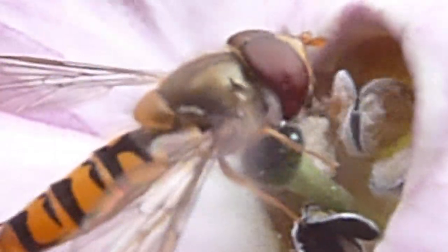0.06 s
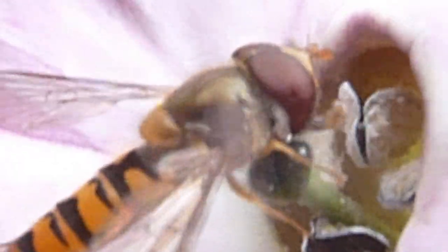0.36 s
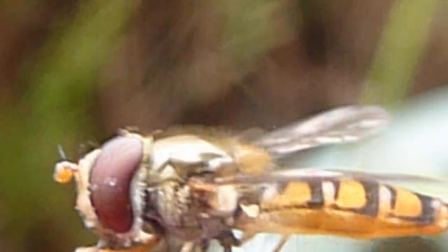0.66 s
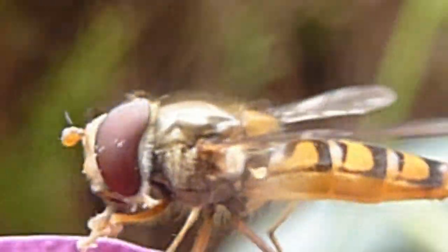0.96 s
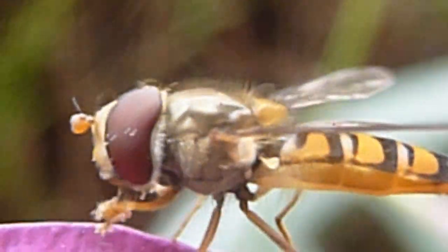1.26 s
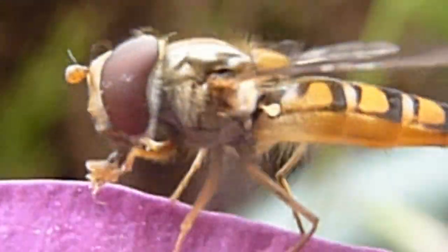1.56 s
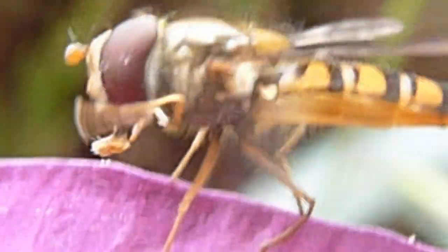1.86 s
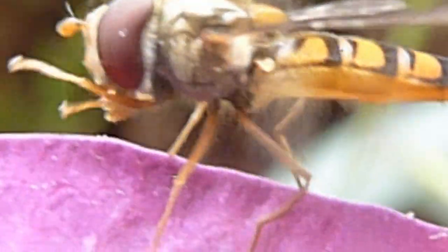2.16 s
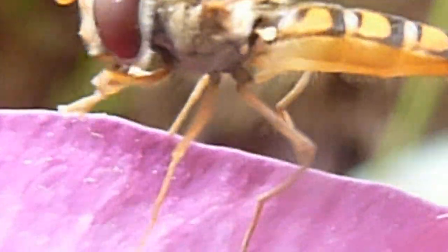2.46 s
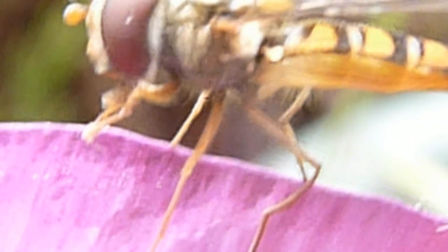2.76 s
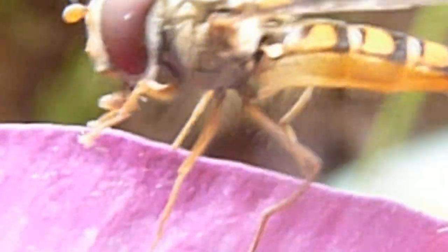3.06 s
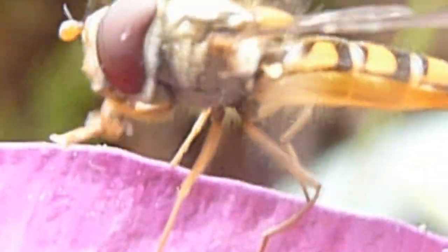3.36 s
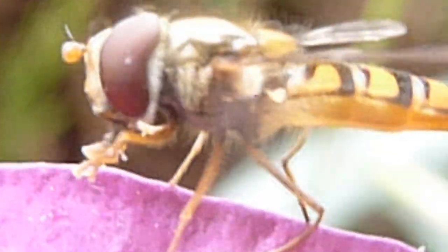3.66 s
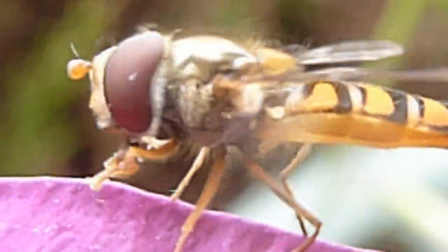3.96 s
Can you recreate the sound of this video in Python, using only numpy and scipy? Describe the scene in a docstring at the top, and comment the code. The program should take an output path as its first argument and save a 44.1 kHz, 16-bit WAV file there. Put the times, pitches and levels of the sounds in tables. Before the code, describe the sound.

A faint, steady outdoor hush of distant traffic and leaves fills a garden, with tiny far-off bird chirps. It cuts out briefly, then returns with one small plastic click, a soft low rumble and a few more chirps.

```python
"""Distant traffic and leaves make a steady hush in a quiet garden, and a low rumble swells and fades.
A small plastic part clicks and rings briefly, followed by a faint whirr. Small birds whistle far off,
their notes scattered by trees and walls. Early on, all goes silent for about half a second.
A low sample rate of 16 kHz cuts the highest treble and leaves a faint mirror image in its place."""
import sys
import numpy as np
from scipy import signal
from scipy.fft import rfft, irfft
from scipy.io import wavfile

SR = 44100
rng = np.random.default_rng(int(sys.argv[2]) if len(sys.argv) > 2 else 0)


def pcm_store(signal):
    """Save signal as 16-bit PCM."""
    levels = np.round(np.clip(np.atleast_2d(signal), -1, 1) * 32767)
    wavfile.write(sys.argv[1], SR, levels.astype(np.int16).T)


N = 176400
GAP_START_S, GAP_END_S = 0.8126, 1.2871  # the silent stretch


def hush(spectrum, level_db):
    """Distant traffic and leaves: noise in octave bands, each flickering a little on its own."""
    bands, flicker_db, flicker_per_s = 9, 1.04, 9
    octave = np.clip(np.log2(freqs() / 32), 0, bands - 1)  # octaves above 32 Hz
    shared_drift_db = -0.06 * drift(2)
    air = rfft(noise(colour(spectrum)))
    out = 0
    for k in range(bands):
        part = irfft(air * np.maximum(1 - abs(octave - k), 0), N)
        out = out + part * undb(shared_drift_db + flicker_db * drift(flicker_per_s))
    return undb(level_db) * out


def passing_traffic():
    """Low rumbles rise and fall as traffic passes far away; tyres sing faintly in a narrow band."""
    # The tone of the rumble. Each row: frequency in Hz, relative level in dB.
    rumble_spectrum = [(30, -21.5), (80, -10.5), (130, -6), (205, 0.5), (300, -7.5), (390, -12.5),
                       (500, -8.5), (700, -20), (1500, -25.5), (4000, -62.5)]
    # Its swells. Each row: peak time in seconds, peak level in dB, half width in seconds, pitch factor.
    swells = [(1.35, -48, 0.19, 2.4), (1.8, -48.5, .3, .6), (2.535, -38, 0.11, 0.99)]
    t = clock()
    tyre_db, tyre_peak_s, tyre_half_width_s = -51, 2.03, 0.4
    tyres = noise(band(hz=950, half_width_hz=160))
    out = undb(tyre_db) * tyres / np.hypot(1, (t - tyre_peak_s) / tyre_half_width_s)
    for peak_s, db, half_width_s, pitch_factor in swells:
        rumble = noise(colour(rumble_spectrum, pitch_factor))
        out = out + undb(db) * rumble / np.hypot(1, (t - peak_s) / half_width_s)
    return out


def plastic_click():
    """A small plastic part snaps: a short crack and quickly dying tones, then a faint whirr."""
    # The plastic's ringing tones. Each row: pitch in Hz, relative level in dB, seconds to fade by 60 dB.
    plastic_tones = [(1690, -9, 0.049), (1930, -10, 0.041), (2500, -10, .025), (2800, -8.5, 0.039),
                     (3410, -11, .03), (3850, -10, 0.028), (4660, -11, 0.022), (5000, -8, 0.025),
                     (5210, -2.5, 0.022), (6640, -12, 0.017)]
    click_s, contact_s, crack_decay_s = 1.3936, 0.0011, 0.0028
    ring_db, crack_db, whirr_db = -28.5, -39.5, -64.5
    whirr_start_s, whirr_end_s, flutter_per_s = 1.6, 1.63, 50
    t = clock()
    age = np.maximum(t - click_s, 0)
    ring = 0
    for hz, db, fade_s in plastic_tones:
        tone = np.sin(2 * np.pi * (hz * age + rng.random()))
        ring = ring + undb(db) * tone * np.exp(-np.log(1000) * age / fade_s)
    crack = noise(band(hz=5750, half_width_hz=3900)) * np.exp(-age / crack_decay_s)
    onset = np.minimum(age / contact_s, 1)
    whirr = noise(band(hz=4950, half_width_hz=230)) * ((t > whirr_start_s) & (t < whirr_end_s))
    flutter = 1 + 0.6 * np.sin(2 * np.pi * flutter_per_s * age)
    return onset * (undb(ring_db) * ring + undb(crack_db) * crack) + undb(whirr_db) * whirr * flutter


def birds():
    """Far birds sing high sliding notes and lower chirps, a little raspy, scattered by trees and walls."""
    # Thin notes that slide up and level off. Each row: start in seconds, length in seconds,
    # first pitch in Hz, last pitch in Hz, level in dB.
    high_notes = [(0, .04, 7400, 7700, -72.5), (0.102, .06, 6060, 7600, -74.5),
                  (.2, .065, 6470, 7600, -69.5), (.295, 0.061, 6400, 7500, -70.5),
                  (0.393, .06, 5800, 7000, -74), (0.727, .05, 6600, 7500, -78)]
    # Lower chirps. Each row: start in seconds, length in seconds, first pitch in Hz,
    # last pitch in Hz, level in dB, pitch waver in Hz.
    lower_chirps = [(0.192, .025, 1970, 2320, -56, 250), (0.264, .035, 2640, 2180, -58, 150),
                    (.345, .05, 2120, 1700, -57.5, 149), (.405, .035, 2420, 2540, -61.5, 150),
                    (0.436, 0.038, 2500, 2600, -54, 140), (0.552, 0.024, 2550, 2510, -56.5, 80),
                    (1.337, 0.03, 4040, 5550, -63, 40), (1.339, 0.023, 5780, 5950, -68, 40),
                    (2.715, 0.023, 4400, 5470, -63.5, 40), (3.785, 0.023, 3750, 3920, -64, 70),
                    (3.914, 0.035, 3850, 3640, -62, 70)]
    slide_s, high_waver_share = 0.01, 0.018
    echo_db, echo_fade_s = -3.5, 0.22
    t, waver = clock(), drift(per_s=900)
    song = 0
    for start, length, first_hz, last_hz, db in high_notes:
        hz = last_hz + (first_hz - last_hz) * np.exp(-np.maximum(t - start, 0) / slide_s)
        song = song + whistle(start, length, hz * (1 + high_waver_share * waver), db)
    for start, length, first_hz, last_hz, db, waver_hz in lower_chirps:
        hz = np.interp(t, [start, start + length], [first_hz, last_hz])
        song = song + whistle(start, length, hz + waver_hz * waver, db)
    song = song * (1 + 0.45 * drift(per_s=510))  # fast shaking of the level sounds raspy
    tail = rng.standard_normal(N) * np.exp(-np.log(1000) * t / echo_fade_s)
    echo = signal.fftconvolve(song, tail / np.sqrt(np.sum(tail ** 2)))[:N]
    return song + undb(echo_db) * echo


def whistle(start, length, hz, db):
    """One bird note: a pure tone that follows a pitch curve as it fades in and out."""
    progress = np.clip((clock() - start) / length, 0, 1)
    loudness = np.sqrt(2 * abs(np.sin(np.pi * progress)))
    return undb(db) * loudness * np.sin(2 * np.pi * np.cumsum(hz) / SR)


def undb(db):
    """Turn decibels into a gain, the number a signal is multiplied by."""
    return 10 ** (np.asarray(db) / 20)


def freqs():
    """The frequency in Hz of each step of the spectrum."""
    return np.maximum(np.arange(N // 2 + 1) * SR / N, 1)


def clock():
    """The time in seconds of each sample."""
    return np.arange(N) / SR


def colour(points, pitch_factor=1):
    """A gain for each frequency, drawn through (Hz, dB) points shifted by a pitch factor."""
    hz, db = np.array(points).T
    return undb(np.interp(np.log(freqs()), np.log(hz * pitch_factor), db))


def noise(gain):
    """Noise shaped by a gain for each frequency, with an average (rms) size of 1."""
    shaped = irfft(rfft(rng.standard_normal(N)) * gain, N)
    return shaped / np.sqrt(np.mean(shaped ** 2))


def band(hz, half_width_hz):
    """A gain for each frequency that peaks at hz and falls away on both sides."""
    return 1 / (1 + ((freqs() - hz) / half_width_hz) ** 2)


def drift(per_s):
    """A smooth random wobble of typical size 1 that changes about per_s times a second."""
    return noise(1 / (1 + (2 * freqs() / per_s) ** 4))


def scene():
    """The garden: one hush before the gap, another with passing traffic after it, birds and a click."""
    # The tone of the hush before and after the gap. Each row: frequency in Hz, relative level in dB.
    early_spectrum = [(20, -20), (45, -11), (90, -2), (160, 1.5), (250, -3.5), (380, -4), (600, -4),
                      (930, -3), (1700, -16), (2800, -22), (4600, -28), (6400, -38), (7600, -48.5)]
    late_spectrum = [(20, -20), (45, -13), (75, -3), (110, -1), (170, -4), (245, -0.5), (380, -5.5),
                     (520, -5.5), (750, -5), (950, -5.5), (1700, -18.5), (2800, -24), (4600, -29.5),
                     (6400, -40), (7600, -54)]
    before = hush(early_spectrum, level_db=-42)
    after = hush(late_spectrum, level_db=-41.5) + passing_traffic()
    air = np.where(clock() < GAP_START_S, before, after)
    return (air + birds() + plastic_click())[None]


def record(dry):
    """A low sample rate cuts the treble and mirrors a faint image of it upward; the gap is silent."""
    # Smoothing that weakens the treble and its mirror image. Each row: frequency in Hz, gain in dB.
    treble_smoothing = [(6000, 0), (8000, -6.5), (9000, -8.5), (11000, -18), (13000, -37.5), (15000, -64.5)]
    low_rate_hz, half_gain_hz, top_hz = 16000, 7570, 15500
    t = clock()
    limit_hz = low_rate_hz / 2  # the highest pitch this rate can carry
    treble_cut = np.clip(0.5 * (limit_hz - freqs()) / (limit_hz - half_gain_hz), 0, 1)
    dulled = irfft(rfft(dry) * treble_cut, N)
    mirrored = dulled * (1 + 2 * np.cos(2 * np.pi * low_rate_hz * t))
    smoothed = irfft(rfft(mirrored) * colour(treble_smoothing), N)
    outside_gap = (t < GAP_START_S) | (t > GAP_END_S)
    top_cut = signal.ellip(8, 0.2, 70, top_hz, fs=SR, output="sos")
    return signal.sosfilt(top_cut, smoothed * outside_gap)


dry = scene()
out = record(dry)
pcm_store(out)
```